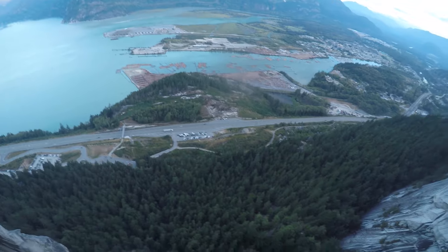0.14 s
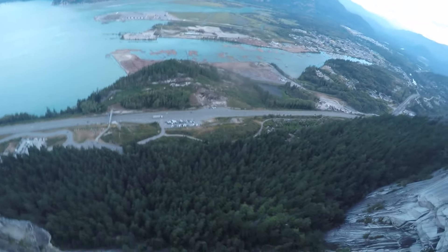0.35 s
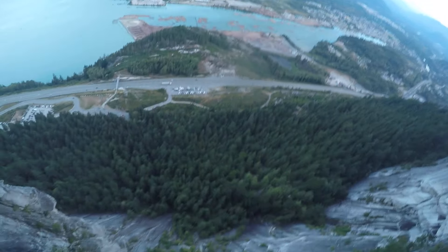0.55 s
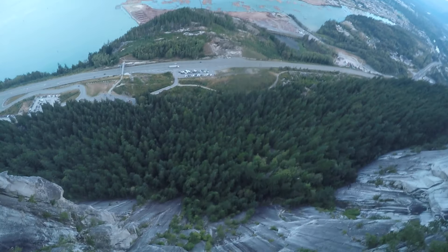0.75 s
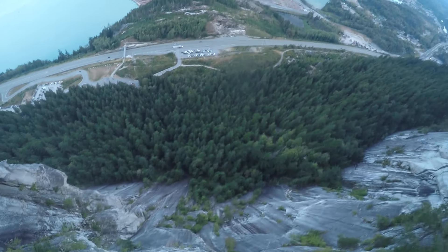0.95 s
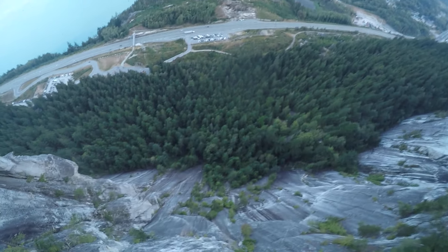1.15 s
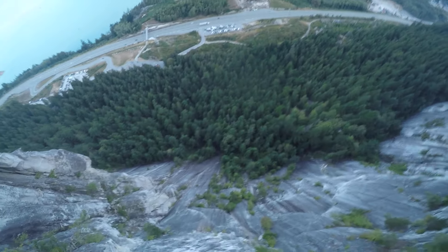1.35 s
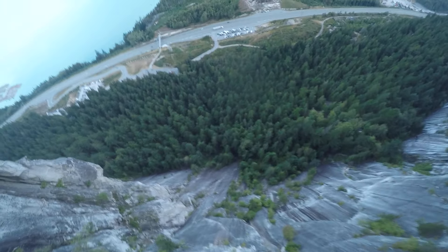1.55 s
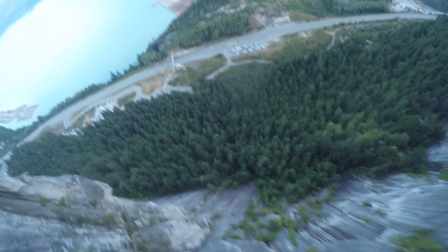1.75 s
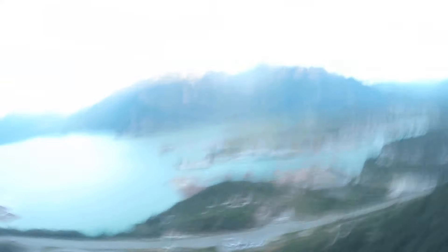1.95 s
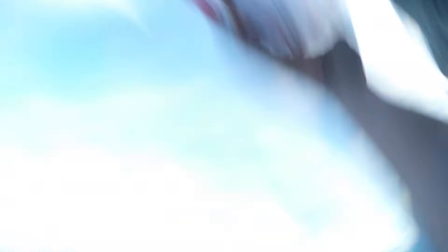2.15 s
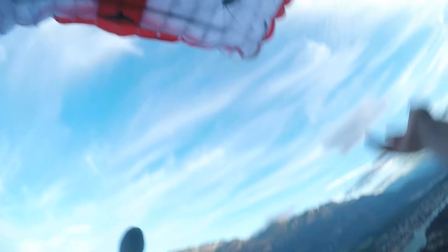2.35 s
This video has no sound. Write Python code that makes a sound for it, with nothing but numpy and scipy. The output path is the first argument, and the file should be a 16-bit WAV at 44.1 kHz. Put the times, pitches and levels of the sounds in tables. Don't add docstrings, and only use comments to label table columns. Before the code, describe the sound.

Wind buffets a falling jumper's helmet microphone, then a parachute cracks open with hard snaps and thuds

```python
import sys
import numpy as np
from scipy import signal
from scipy.fft import rfft, irfft
from scipy.io import wavfile
from scipy.ndimage import uniform_filter1d

SR = 44100
rng = np.random.default_rng(int(sys.argv[2]) if len(sys.argv) > 2 else 0)


def attenuation_scalar(level_db):
    decades = np.asarray(level_db, float) / 20
    return 10 ** decades


def log_audio(samples):
    frames = np.atleast_2d(samples).T
    limited = np.clip(frames, -1, 1)
    pcm = np.round(limited * 32767).astype(np.int16)
    wavfile.write(sys.argv[1], SR, pcm)


N = 110250


def rms_one(x):
    return x / np.sqrt(np.mean(x ** 2) + 1e-20)


def in_time(rows):
    s, db = np.transpose(rows)
    return attenuation_scalar(np.interp(np.arange(N) / SR, s, db, left=db[0], right=db[-1]))


def drift(rate_hz):
    r = np.exp(-2 * np.pi * rate_hz / SR)
    noise = rng.standard_normal(N + SR)
    return rms_one(signal.lfilter([1], [1, -2 * r, r * r], noise)[SR:])


def coloured(tone):
    hz, db = np.transpose(tone)
    f = np.arange(1, N // 2 + 2) * SR / N
    gain = attenuation_scalar(np.interp(np.log(f), np.log(hz), db, left=-90, right=-90))
    return rms_one(irfft(rfft(rng.standard_normal(N)) * gain, N))


def resonate(x, peaks):
    out = 0
    for k, (hz, width, db) in enumerate(peaks):
        r = np.exp(-np.pi * width / SR)
        poles = [1, -2 * r * np.cos(2 * np.pi * hz / SR), r * r]
        gain = (-1) ** k * attenuation_scalar(db) * (1 - r * r) / 2
        out = out + gain * signal.lfilter([1, 0, -1], poles, x)
    return out


def twice(x, peaks):
    out = 0
    for hz, width, db in peaks:
        once = resonate(x, [(hz, width, 0)])
        out = out + resonate(once, [(hz, width * 2, db)])
    return rms_one(out)


def cut(x, hz, kind, order=2):
    return signal.sosfilt(signal.butter(order, hz, kind, fs=SR, output="sos"), x)


def add(out, x, s):
    i = int(s * SR)
    out[i:i + len(x)] += x[:N - i]


# time_s, level_db
BUFFET_LEVEL = [(0, -27), (.5, -22), (.9, -31), (1.1, -24), (1.27, -25), (1.42, -16), (1.7, -21),
                (1.95, -21.5), (2.2, -6.5), (2.26, -29), (2.4, -39.5), (2.5, -36)]
# frequency_hz, density_db
BUFFET_SPECTRUM = [(8.8, -64), (15, 4), (32, -8.5), (48, -1), (141, -20), (330, -34.5), (400, -93),
                   (520, -94), (880, -120)]
# centre_s, peak_db, pitch_hz, length_s
EDDIES = [(0.088, -14.5, 35, 0.043), (0.268, -6.5, 34.8, 0.099), (0.407, -10.5, 37.7, 0.034),
          (0.477, -7, 31.4, 0.16), (0.66, -7.5, 33, 0.099), (0.855, -15.5, 43.2, 0.23),
          (0.99, -11, 30.5, 0.19), (1.176, -18.5, 47, 0.097), (1.408, -7.5, 37.6, 0.049),
          (1.472, -5.5, 48.4, 0.085), (1.61, -10, 55.6, 0.034), (1.698, -9.5, 46.4, 0.11),
          (1.764, -10, 33.9, 0.147), (1.849, -6.5, 37.1, 0.12), (1.911, -9.5, 32.6, 0.084),
          (2.098, -6.5, 35.4, 0.054), (2.148, -10.5, 33.1, 0.238), (2.266, -20.5, 33.5, 0.03)]
BUFFET_EVEN = 0.61
EDDY_BEND = 3.0


def buffet():
    x = coloured(BUFFET_SPECTRUM)
    swell = uniform_filter1d(np.abs(signal.hilbert(x)), size=600)
    evened = rms_one(x / (swell + 0.037) ** BUFFET_EVEN)
    out = in_time(BUFFET_LEVEL) * cut(evened, 153, "low")
    chance = rng.uniform(-1.19, 1, (len(EDDIES), 2))
    for (s, db, hz, length), (phase, bend) in zip(EDDIES, chance):
        t = np.arange(-length / 2, length / 2, 1 / SR)
        window = np.cos(np.pi * t / length) ** 2
        cycles = hz * t * (1 + bend * EDDY_BEND * t)
        add(out, attenuation_scalar(db) * window * np.cos(2 * np.pi * cycles + np.pi * phase), s - length / 2)
    return out


# start_s, peak_db, ring_hz, ring_t60_s, crack_re_ring_db
CRACKS = [(.7695, -17, 620, 0.012, -26), (.7728, -12, 830, 0.014, -18), (1.8122, -4.5, 890, 0.014, -3.5),
          (1.8138, -6, 750, 0.01, -5), (1.818, -15, 1000, 0.027, -19), (1.832, 5, 1660, 0.02, -13),
          (1.8538, -4, 1160, 0.0054, -16.5), (1.867, -14.5, 1850, 0.0099, -8), (2.002, -17, 650, 0.01, -13),
          (2.0275, -12, 700, 0.008, -2), (2.0298, -7, 490, 0.015, -11.5), (2.034, -20, 890, 0.019, -3),
          (2.0645, -5, 813, 0.017, -8), (2.08, -15, 1900, 0.008, -2), (2.094, -18.5, 2590, 0.0072, -5),
          (2.1285, -5, 1900, 0.011, -3), (2.1295, -9, 900, 0.012, -20), (2.132, -8.5, 1700, 0.012, -5),
          (2.1722, -10.5, 700, 0.036, -21), (2.1748, -8, 770, 0.025, -22), (2.1771, -3, 760, 0.013, -6.5),
          (2.1782, -5, 340, 0.0143, -4.5), (2.188, -18, 550, 0.01, -21), (2.1989, 1.5, 1150, 0.0065, -9),
          (2.2005, 3.5, 332, 0.027, -24.5), (2.203, -9, 620, 0.013, -15), (2.228, -16, 420, 0.008, -16),
          (2.296, -16, 690, 0.016, -3), (2.379, -24, 400, 0.016, -8), (2.45, -23, 255, 0.025, -15),
          (2.494, -30.5, 450, 0.015, -26)]
# frequency_hz, width_hz, level_db
HOUSING = [(764, 390, -1.5), (1480, 75, 7), (1700, 160, 3), (2076, 140, 8), (2806, 265, -2.5)]
CRACK_S, CRACK_CUT_HZ, DULL_PER_DB = 0.00086, 3520, 0.54
TICK_S, TICK_DB, TICK_GROWS = .0006, -15, 1.1


def cracks():
    out, t = np.zeros(N), np.arange(3000) / SR
    for (s, db, hz, t60, crack_db), noise in zip(CRACKS, rng.standard_normal((len(CRACKS), 3000))):
        dull = cut(noise, CRACK_CUT_HZ * attenuation_scalar(DULL_PER_DB * db), "low", order=3)
        burst = dull * (t / CRACK_S) * np.exp(1 - t / CRACK_S)
        tick = attenuation_scalar(TICK_DB + TICK_GROWS * db) * noise * (t / TICK_S) * np.exp(1 - t / TICK_S)
        ring = np.sin(2 * np.pi * hz * t) * attenuation_scalar(-60 * t / t60) * (1 - np.exp(-t / .0003))
        crack = 3 * burst + 2.15 * resonate(burst + tick, HOUSING) + tick
        add(out, attenuation_scalar(db) * (cut(ring, hz / 2, "high") + attenuation_scalar(crack_db) * crack), s)
    return out


# start_s, peak_db, pitch_hz, t60_s
JOLTS = [(0.434, -12.5, 200, 0.011), (0.632, -17.5, 141, 0.051), (1.165, -30.5, 193, 0.14),
         (0.773, -2.5, 63.7, 0.099), (0.581, -28.5, 220, 0.082), (0.941, -5, 61.4, 0.16),
         (0.943, -25, 173, 0.41), (1.8041, 0.5, 61.4, 0.27), (1.869, -11, 122, 0.055),
         (1.998, -13.5, 111, 0.017), (2.065, -13.5, 220, 0.027), (2.113, -6, 70.4, 0.038),
         (2.174, -3.5, 73.5, 0.04), (2.2, 4.5, 48.6, 0.082), (2.203, -7.5, 168, 0.033)]


def jolts():
    out, t = np.zeros(N), np.arange(9000) / SR
    for s, db, hz, t60 in JOLTS:
        sagging_t = t + 0.0055 * (1 - np.exp(-t / 0.0035))
        onset = 1 - np.exp(-t / 0.00081)
        add(out, attenuation_scalar(db - 60 * t / t60) * np.sin(2 * np.pi * hz * sagging_t) * onset, s)
    return out


# time_s, level_db
STREAM_LEVEL = [(0, -49), (.17, -47), (.35, -41.5), (.5, -42), (.8, -39.5), (.92, -43.5), (1.1, -38),
                (1.52, -38.5), (1.6, -37.5), (1.68, -34), (1.79, -32.5), (1.84, -35), (2.0, -42.5),
                (2.165, -32), (2.19, -40), (2.33, -47.5), (2.5, -52.5)]
# frequency_hz, density_db
STREAM_SPECTRUM = [(300, -16), (700, 0), (1190, -3), (1720, 2), (3800, -5.5), (4250, -13), (8000, -26),
                   (14500, -34)]
# frequency_hz, width_hz, level_db
WHISTLE_MODES = [(2530, 270, 4.5), (3150, 390, 1.5), (3780, 310, -3.5), (8200, 870, -22.5),
                 (13500, 1000, -34)]
# frequency_hz, width_hz, level_db
HOUSING_TOP = [(4500, 650, 0), (5800, 900, -8), (7400, 1000, -13), (9250, 500, -10), (11800, 1600, -18),
               (13500, 1200, -21)]
PORT = (1700, 58, -4)
SEAM_DB, FLICKER_DB = -34, 1.2
WHISTLE_DB, WHISTLE_POWER = -45, 2.2
RUMBLE_DB, RUMBLE_POWER, RUMBLE_HZ, RUMBLE_RIDES = -41.5, 0.9, (92, 262), 0.56


def stream(pressure):
    speed = in_time(STREAM_LEVEL)
    flicker = attenuation_scalar(FLICKER_DB * (drift(20) + drift(150)))
    air = coloured(STREAM_SPECTRUM) * flicker
    seams = attenuation_scalar(SEAM_DB) * twice(air, HOUSING_TOP[3:])
    hiss = rms_one(air + resonate(air, [PORT]) + seams)

    broad = resonate(rng.standard_normal(N) * flicker, [(2780, 2800, 0.011)])
    whistle = resonate(broad, WHISTLE_MODES[:3]) + resonate(rng.standard_normal(N), WHISTLE_MODES[3:])
    whistle_gain = attenuation_scalar(WHISTLE_DB) * (speed / attenuation_scalar(-38.5)) ** WHISTLE_POWER

    band = cut(cut(rng.standard_normal(N), RUMBLE_HZ[0], "high"), RUMBLE_HZ[1], "low")
    rumble = rms_one(band * attenuation_scalar(1.5 * drift(14.0)))
    rides = (uniform_filter1d(np.abs(pressure), size=900) * 10 + 0.0072) ** RUMBLE_RIDES
    rumble_gain = attenuation_scalar(RUMBLE_DB) * (speed / attenuation_scalar(-40)) ** RUMBLE_POWER * rides
    return speed * hiss + whistle_gain * rms_one(whistle) + rumble_gain * rumble


# start_s, length_s, level_db, fade_over_length_db, brightness_db
RUBS = [(0.362, 0.067, -43.5, 2.5, 7), (0.388, 0.0038, -22.5, 19, 4.5), (0.3983, 0.0025, -23, 5, 3),
        (0.405, 0.0042, -21, 13, -2), (0.432, 0.0051, -34, 4, 0), (0.448, 0.046, -44, -3.5, 4),
        (0.559, 0.12, -36, 7, -15), (0.581, 0.039, -31.5, 17, 3), (.689, 0.003, -27.5, 8, 8.5),
        (.69, 0.015, -31, 17, -12), (0.939, 0.14, -30.5, 7.5, 9.5), (1.127, 0.033, -40, -8.5, 4),
        (1.17, 0.0034, -14, 20, 5), (1.19, 0.026, -26, 19, 4), (1.24, .06, -28.5, -4.5, 2.5),
        (1.3, 0.0035, -37, 4, 13), (1.314, 0.058, -41, 16, 12.5), (1.39, 0.016, -53, 24, 31),
        (1.435, 0.0082, -28.5, 0.5, 11.5), (1.513, 0.01, -38, 6, 4), (1.799, 0.011, -20, 3, 13),
        (1.813, 0.013, -21, 8, 9), (2.062, 0.02, -21, 17, 3), (2.108, 0.03, -32.5, -4, 6),
        (2.15, 0.022, -29, 7, 6), (2.091, 0.011, -31, 12, -3), (2.134, 0.013, -24, 9, -3),
        (2.17, .01, -56, -1, -20), (2.188, 0.011, -18.5, 13, -6), (2.422, 0.003, -42, 6, 8),
        (2.434, 0.003, -40, 6, 8), (2.44, 0.0084, -39.5, 5, 4)]
RUB_EDGE_HZ, RUB_BROAD_DB, RUB_GRAIN_DB, TOP_DB = 300, -14, 1.5, -18
TREBLE_FADES = 1.7
HOUSING_SHIFTS_DB = 1.2


def rubs():
    level, bright = np.zeros(N), np.zeros(N)
    for s, length, db, fade_db, bright_db in RUBS:
        shape = attenuation_scalar(db - np.linspace(0, fade_db, max(int(length * SR), 8)))
        add(level, shape, s)
        add(bright, (shape / attenuation_scalar(db)) ** TREBLE_FADES * attenuation_scalar(db + bright_db + TOP_DB), s)
    grit = rng.standard_normal(N) * attenuation_scalar(RUB_GRAIN_DB * drift(150))
    modes = 0
    for k, peak in enumerate(HOUSING):
        modes = modes + (-1) ** k * resonate(grit, [peak]) * attenuation_scalar(HOUSING_SHIFTS_DB * drift(6.0))
    broad = cut(cut(grit, 2300, "low"), 830, "high")
    body = rms_one(cut(modes, 5300, "low") + attenuation_scalar(RUB_BROAD_DB) * broad)
    high = twice(grit, HOUSING_TOP)
    level = cut(level, RUB_EDGE_HZ, "low", order=1)
    bright = cut(bright, RUB_EDGE_HZ, "low", order=1)
    return level * body + bright * high


# start_s, length_s, level_db, pitch_hz, width_hz
SQUEAKS = [(.432, .006, -28, 1400, 700), (.582, .03, -34, 1950, 300), (.688, .008, -40, 5800, 500),
           (.688, .014, -36, 2100, 250), (.945, .11, -37, 2010, 160), (.95, .08, -42, 2840, 200),
           (1.188, .014, -31, 1700, 150), (1.243, .058, -32, 1710, 180), (1.25, .045, -37, 1480, 120),
           (1.25, .05, -38, 2900, 400), (1.434, .009, -42, 8200, 1500), (2.145, .025, -33, 3500, 900)]
SQUEAK_EDGE_S = .0015


def squeaks():
    out = np.zeros(N)
    for (s, length, db, hz, width), noise in zip(SQUEAKS, rng.standard_normal((len(SQUEAKS), 8000))):
        t = np.arange(int(length * SR)) / SR
        attack = 1 - np.exp(-t / SQUEAK_EDGE_S)
        release = 1 - np.exp((t - length) / (3 * SQUEAK_EDGE_S))
        settled = twice(noise, [(hz, width, 0)])[-len(t):]
        add(out, attenuation_scalar(db) * attack * release * settled, s)
    return out


# time_s, level_db
PAYOUT_LEVEL = [(1.835, -63), (1.87, -39), (1.95, -34.5), (2.0, -31), (2.08, -37.5), (2.17, -48),
                (2.195, -88)]
# frequency_hz, width_hz, level_db
LINE_MODES = [(700, 330, 4.5), (1700, 880, 1.5), (2540, 1000, -6.5), (3670, 1500, -8), (4840, 1900, -14),
              (6800, 2000, -14), (9200, 2000, -20), (12200, 1100, -17), (13700, 1500, -28)]


def payout():
    t = np.arange(N) / SR
    running = (t > PAYOUT_LEVEL[0][0]) & (t < PAYOUT_LEVEL[-1][0])
    grit = rng.standard_normal(N) * attenuation_scalar(1.2 * drift(83))
    return running * in_time(PAYOUT_LEVEL) * twice(grit, LINE_MODES)


def scene():
    pressure = buffet() + jolts()
    return (pressure + stream(pressure) + rubs() + cracks() + payout() + squeaks())[None]


def band_limit(x):
    return signal.sosfilt(signal.butter(12, 16500, fs=SR, output="sos"), x)


MIC_CUT_HZ, INPUT_CUT_HZ, CEILING = 14200, 21000, 1.0


def record(dry):
    x = cut(dry, MIC_CUT_HZ, "low", order=6)
    overloaded = x / (1 + np.abs(x / CEILING) ** 4) ** (1 / 4)
    mix = cut(overloaded, INPUT_CUT_HZ, "low", order=8)
    return band_limit(mix)


dry = scene()
out = record(dry)
log_audio(out)
```